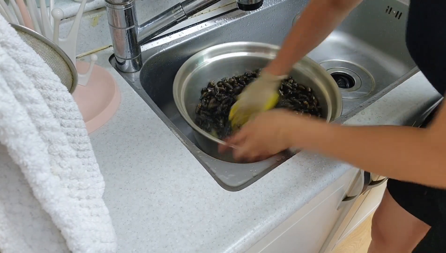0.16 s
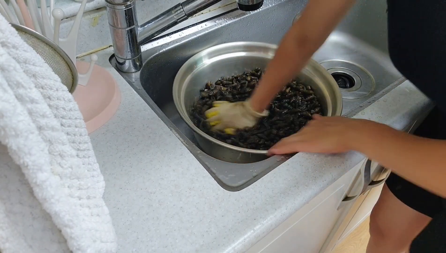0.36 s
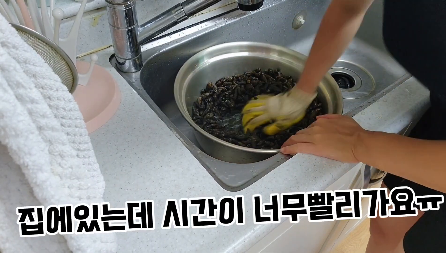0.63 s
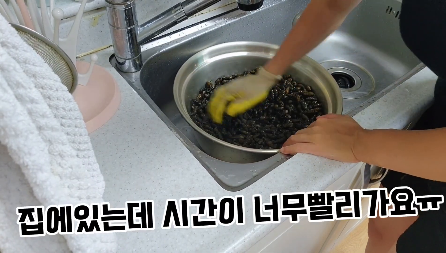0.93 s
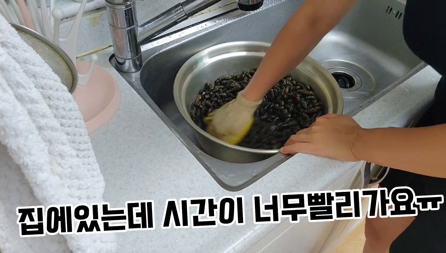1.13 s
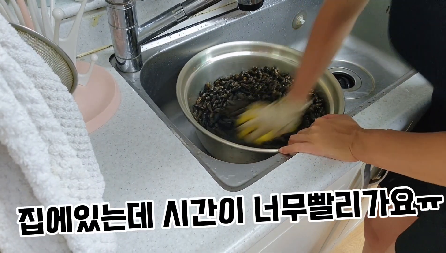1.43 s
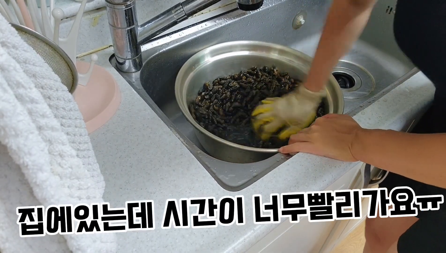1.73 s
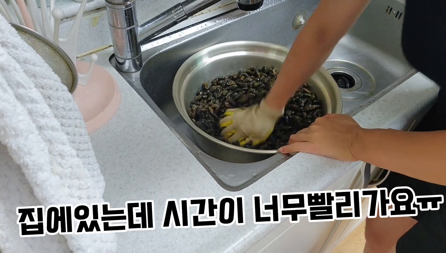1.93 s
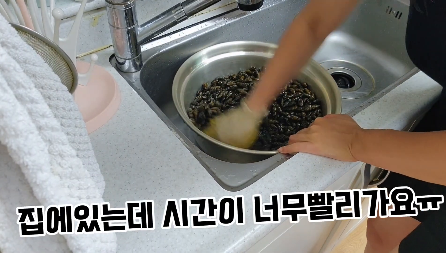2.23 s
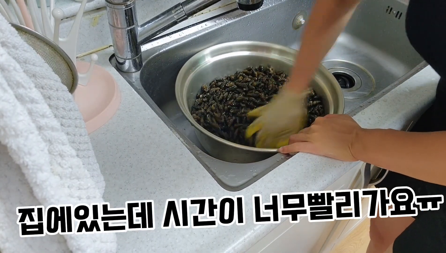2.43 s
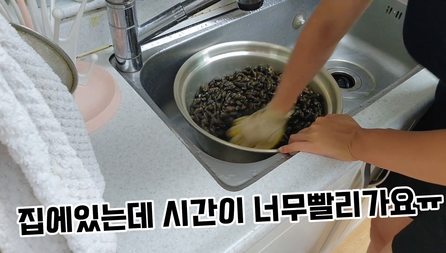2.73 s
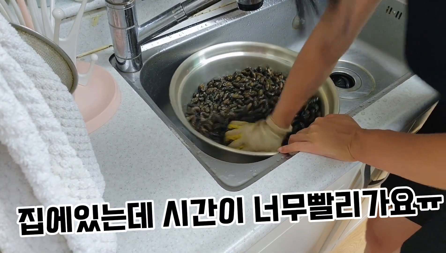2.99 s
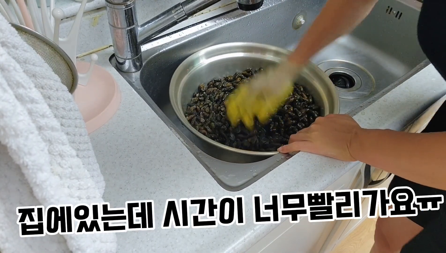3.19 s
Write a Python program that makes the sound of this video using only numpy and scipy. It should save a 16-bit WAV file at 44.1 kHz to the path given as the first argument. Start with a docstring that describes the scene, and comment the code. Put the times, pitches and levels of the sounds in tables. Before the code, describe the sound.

Rhythmic crunching and rattling of wet snail shells rubbed around a metal bowl in a sink.

```python
"""In a kitchen sink, a gloved hand scrubs a heap of small wet snails round a steel bowl.
Thousands of shell impacts superpose into a swish: a light rattle while the hand circles, a crunch at
each push. Clumps clack, jammed shells rasp and small bubbles ring in the water between them.
Pushes that reach the bottom drive the bowl's modes by stick-slip friction and flex the sink.
A small hard room reverberates over a faint steady hiss of air."""
import sys
import numpy as np
from scipy import signal
from scipy.fft import rfft, irfft
from scipy.io import wavfile

SR = 44100
rng = np.random.default_rng(int(sys.argv[2]) if len(sys.argv) > 2 else 0)


def pcm_store(signal):
    """Save signal as 16-bit PCM."""
    levels = np.round(np.clip(np.atleast_2d(signal), -1, 1) * 32767)
    wavfile.write(sys.argv[1], SR, levels.astype(np.int16).T)


N = 147735
T = np.arange(N) / SR
HZ = np.maximum(np.arange(N + 1) * SR / (2 * N), 1)

# spectrum of the quiet room air: frequency_hz, relative_db
AIR_SPECTRUM = [(20, -25), (50, -4), (110, -2), (300, -17), (1000, -10.5), (4000, -14), (15000, -6)]
# modes of the loaded bowl and the sink under it: pitch_hz, width_hz, relative_db
BOWL_MODES = [(112.8, 21.5, 3.5), (182.4, 35, 2), (207.5, 24, 0.5), (264, 30, -12), (301, 56, 3),
              (385, 54, -11), (447.2, 10.7, 2.5), (551, 42, 3), (745, 84, 2.5), (866, 28, -1),
              (977, 120, -5), (1252, 45, 2.5), (1780, 290, -8)]
# slips of jammed shells: start_s, centre_hz, level_db
RASPS = [(0.327, 575, -21.5), (.368, 232, -24), (0.731, 1270, -32), (1.064, 1760, -26), (1.447, 738, -23.5),
         (2.23, 1990, -34), (2.572, 1780, -19.5), (2.975, 1880, -21), (2.985, 269, -24)]
# collisions of clumps of shells: start_s, level_db, rise_s, decay_s
CLACKS = [(.643, -22, .003, 0.0059), (.843, -25, 0.0059, 0.01), (1.0126, -11, 0.00053, 0.0078),
          (1.22, -17, .002, .006), (2.197, -20.5, .002, 0.022), (2.827, -15, 0.015, 0.013),
          (3.152, -30, 0.0043, .007)]
# modes of a clump: pitch_hz, width_hz, relative_db
CLINK_MODES = [(1790, 100, -13), (3060, 260, -12.5), (3630, 130, -2.5), (4340, 200, 0), (4530, 51, 4.5)]
# spectrum of the shell clicks: frequency_hz, relative_db
SHELL_SPECTRUM = [(100, -40), (500, -29.5), (1100, -17), (1900, -11), (2400, -11), (3000, -7.5),
                  (3600, -6.5), (4150, -1.5), (4550, -0.5), (5200, -9), (6200, -10), (7400, -17),
                  (8500, -21.5), (9700, -16.5), (10900, -22), (12100, -19.5), (13300, -22.5),
                  (15800, -22.5)]
# light stirring, which dies away when the hand lifts: time_s, level_db
STIR_LEVELS = [(0, -21), (.2, -29), (.47, -24), (.61, -28), (.7, -18), (.85, -29.5), (.9, -38.5),
               (1.005, -47), (1.025, -26.5), (1.23, -22.5), (1.34, -27), (1.365, -28.5), (1.56, -23.5),
               (1.76, -27), (1.795, -18.5), (1.99, -30), (2.1, -44), (2.185, -43.5), (2.21, -25.5),
               (2.33, -30), (2.41, -23.5), (2.51, -26.5), (2.78, -26), (3.06, -28.5), (3.21, -43),
               (3.35, -45.5)]
# hard pushes through the heap: start_s, rise_s, hold_s, shell_db, grind_db, grind_hold_s, thud_db
PUSHES = [(0.237, .09, 0.062, -14, -25.5, 0.078, -41), (0.652, 0.075, 0.037, -14.5, -21, 0.025, -43),
          (1.041, 0.031, 0.041, -14.5, -38.5, 0.091, -44), (1.396, 0.058, 0.087, -14, -26, 0.052, -40),
          (1.784, 0.081, 0.027, -16, -23, 0.014, -34.5), (2.201, 0.038, 0.019, -14, -36.5, 0.037, -47),
          (2.51, 0.065, 0.069, -13.5, -27, 0.073, -44), (2.865, 0.083, 0.044, -14, -24, 0.045, -42)]

ROOM_T60_S, ROOM_TREBLE_T60_S, ROOM_DB, ROOM_GAP_S = .48, 0.61, -11, .006
THUD_HZ, THUD_WIDTH_HZ = 50.4, 18
BUBBLES_PER_S, BUBBLE_LOW_HZ, BUBBLE_HIGH_HZ, BUBBLE_DB = 70, 499, 3830, -15
BUBBLE_DECAY_CYCLES, BUBBLE_GLIDE = 13.5, 0.0377  # glide: fractional pitch rise per decay time
RASP_RELATIVE_WIDTH, RASP_RISE_S, RASP_HOLD_S, RASP_RELEASE_S = 0.25, 0.0072, 0.0056, 0.0083
CLICK_DECAY_S, BASIN_DECAY_S, BASIN_DB = 0.00047, 0.011, 1.5
PUSH_CLICKS_PER_S, STIR_CLICKS_PER_S, SIZE_SPREAD_DB, PUSH_TILT_DB_PER_OCT = 4600, 2600, 3.5, 0.77
PUSH_RELEASE_S, GRIND_RELEASE_S, GRIND_LAG_S = 0.029, 0.034, 0.0049
STIR_GRIND_DB, STIR_THUD_DB = -16, -30  # relative to the stirring level


def undb(db):
    """Amplitude grows tenfold for every 20 dB."""
    return 10 ** (np.asarray(db) / 20)


def unit(x):
    """Normalisation to rms 1."""
    return x / np.sqrt(np.mean(np.abs(x) ** 2))


def through(x, response):
    """Linear filtering multiplies the spectrum by a frequency response."""
    return irfft(rfft(x, 2 * N) * response)[:N]


def colour(points, tilt_db=0):
    """A one-sided cepstrum gives a causal response along (Hz, dB) points, tilted per octave."""
    hz, db = np.array(points).T
    curve_db = np.interp(np.log(HZ), np.log(hz), db) + tilt_db * np.log2(HZ)
    cepstrum = irfft(np.log(undb(curve_db)))
    return unit(np.exp(rfft(2 * cepstrum[:N], 2 * N)))


def resonance(hz, width_hz):
    """Response of a damped oscillator, gain 1 at its centre."""
    return 1 / (1 + 1j * (HZ ** 2 - hz ** 2) / (HZ * width_hz))


def contacts(per_s):
    """Independent impacts form a Poisson train of uneven sizes, rms 1."""
    at = np.flatnonzero(rng.random(N) < per_s / SR)
    spread = np.clip(rng.standard_normal(N)[at], -2, 2)
    out = np.zeros(N)
    out[at] = undb(SIZE_SPREAD_DB * spread) * (-1.) ** at
    return unit(out)


def stroke(start, rise, hold, release):
    """Envelope of a force: smooth rise, hold and exponential relaxation."""
    onset = np.sin(np.pi / 2 * np.clip((T - start) / rise, 0, 1)) ** 2
    return onset * np.exp(-np.maximum(T - start - rise - hold, 0) / release)


def air(level_db=-46.5):
    """Room air is heard as stationary coloured noise."""
    return undb(level_db) * through(rng.standard_normal(N), colour(AIR_SPECTRUM))


def diffuse_tail(t60_s):
    """Frequency response of a diffuse field: noise that decays by 60 dB in t60_s."""
    decay_s = t60_s / np.log(1000)
    return unit(rfft(rng.standard_normal(N) * np.exp(-np.minimum(T / decay_s, 20)), 2 * N))


def kitchen(x):
    """Reverberation: hard walls add a short tail, slightly longer above the crossover."""
    low_share = 1 / (1 + (HZ / 7000) ** 4)
    tail = low_share * diffuse_tail(ROOM_T60_S) + (1 - low_share) * diffuse_tail(ROOM_TREBLE_T60_S)
    delay = np.exp(-2j * np.pi * HZ * ROOM_GAP_S)
    return through(x, unit(1 + undb(ROOM_DB) * tail * delay))


def sink(force):
    """Flexural resonance: the basin booms softly under the weight of the arm."""
    return force * unit(through(rng.standard_normal(N), resonance(THUD_HZ, THUD_WIDTH_HZ) ** 2))


def bowl(force):
    """Forced vibration: shells stick and slip over the steel and drive each damped mode."""
    modes = [undb(db) * resonance(hz, width) for hz, width, db in BOWL_MODES]
    power = sum(np.mean(np.abs(mode) ** 2) for mode in modes)
    return sum(through(force * contacts(PUSH_CLICKS_PER_S), mode) for mode in modes) / np.sqrt(power)


def bubbles(force):
    """Bubble resonance: air trapped by the moving heap rings with a slightly rising pitch."""
    out, t = np.zeros(N), T[:SR // 10]
    pitch, size = rng.random((2, N))
    for i in np.flatnonzero(rng.random(N) < BUBBLES_PER_S / SR):
        cycles = t * BUBBLE_LOW_HZ * (BUBBLE_HIGH_HZ / BUBBLE_LOW_HZ) ** pitch[i]
        age = cycles / BUBBLE_DECAY_CYCLES
        ring = np.sin(2 * np.pi * cycles * (1 + BUBBLE_GLIDE * age / 2)) * np.exp(-age)
        out[i:i + len(t)] += (2 * size[i] ** 2 * force[i] * ring)[:N - i]
    return undb(BUBBLE_DB) * out


def rasps():
    """Stick-slip friction: jammed shells give way with a brief, hollow band of noise."""
    out = 0
    for start, hz, db in RASPS:
        grit = unit(through(rng.standard_normal(N), resonance(hz, hz * RASP_RELATIVE_WIDTH) ** 2))
        out = out + undb(db) * stroke(start, RASP_RISE_S, RASP_HOLD_S, RASP_RELEASE_S) * grit
    return out


def clacks(clink_db=5.5):
    """Impact excitation: colliding clumps ring briefly in their modes, over the shells' own colour."""
    force = sum(undb(db) * stroke(start, rise, 0, decay) for start, db, rise, decay in CLACKS)
    clink = sum(undb(db) * resonance(hz, width) for hz, width, db in CLINK_MODES)
    response = unit(colour(SHELL_SPECTRUM) + undb(clink_db) * unit(clink))
    return through(force * rng.standard_normal(N), response)


def ticks(force, per_s, places=32, samples=2048):
    """Early reflection: ticks from each place in the heap have their own quick echoes off the steel."""
    t, out = T[:samples], 0
    for _ in range(places):
        tick, echo = rng.standard_normal((2, samples))
        direct = unit(tick * np.exp(-t / CLICK_DECAY_S))
        reflected = undb(BASIN_DB) * unit(echo * np.exp(-t / BASIN_DECAY_S))
        out = out + signal.oaconvolve(force * contacts(per_s / places), unit(direct + reflected))[:N]
    return out / np.sqrt(places * samples)


def shells(force, per_s, tilt_db=0):
    """Source and filter: dense ticks take the colour of the hollow shells."""
    return through(ticks(force, per_s), colour(SHELL_SPECTRUM, tilt_db))


def scene():
    """Superposition: the hand drives shells, steel and water, and their sounds add in the kitchen."""
    stir = undb(np.interp(T, *np.array(STIR_LEVELS).T))
    push = grind = weight = 0
    for start, rise, hold, shell_db, grind_db, grind_hold, thud_db in PUSHES:
        press = stroke(start, rise, hold, PUSH_RELEASE_S)
        push = push + undb(shell_db) * press
        weight = weight + undb(thud_db) * press
        grind = grind + undb(grind_db) * stroke(start + GRIND_LAG_S, rise, grind_hold, GRIND_RELEASE_S)
    crunch = shells(push, PUSH_CLICKS_PER_S, PUSH_TILT_DB_PER_OCT)
    rattle = shells(stir, STIR_CLICKS_PER_S)
    heap = crunch + rattle + clacks()
    rumble = bowl(np.hypot(grind, undb(STIR_GRIND_DB) * stir))  # the two drives add in power
    thud = sink(np.hypot(weight, undb(STIR_THUD_DB) * stir))
    sources = heap + rumble + thud + rasps() + bubbles(push + stir)
    return (kitchen(sources) + air())[None]


def record(dry, cutoff_hz=15700):
    """Soft saturation rounds the highest peaks; a steep low-pass limits the bandwidth."""
    lowpass = signal.ellip(12, .2, 70, cutoff_hz, fs=SR, output="sos")
    return signal.sosfilt(lowpass, np.tanh(dry))


dry = scene()
out = record(dry)
pcm_store(out)
```